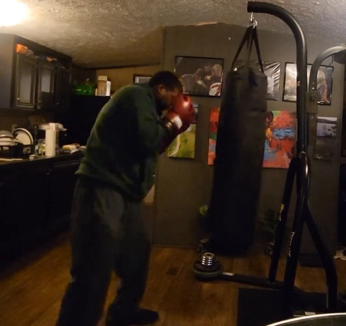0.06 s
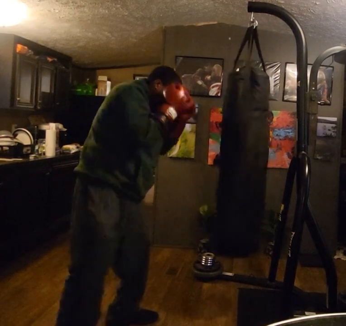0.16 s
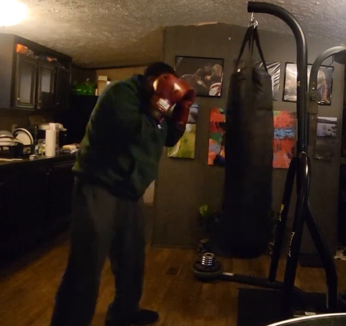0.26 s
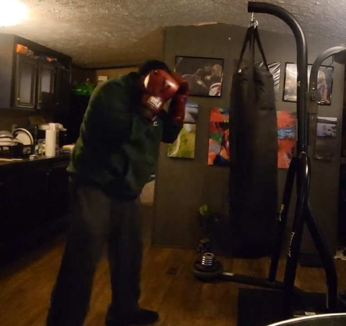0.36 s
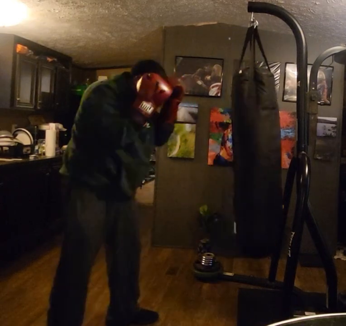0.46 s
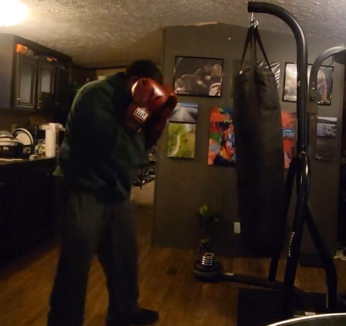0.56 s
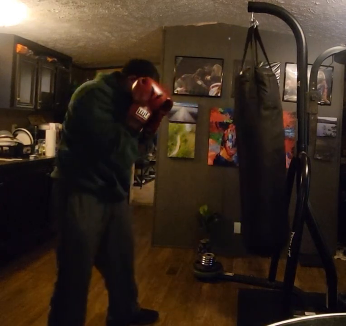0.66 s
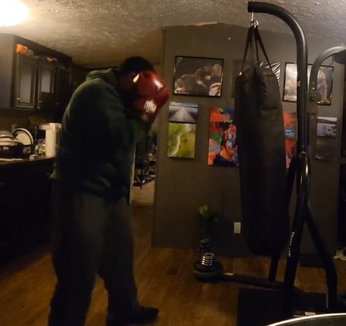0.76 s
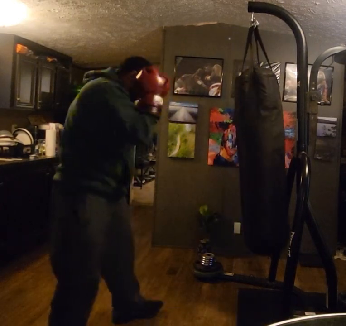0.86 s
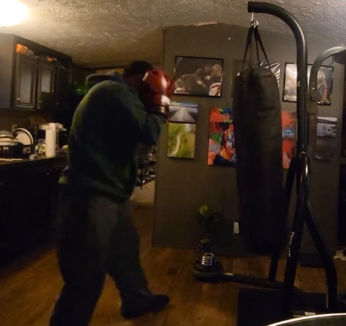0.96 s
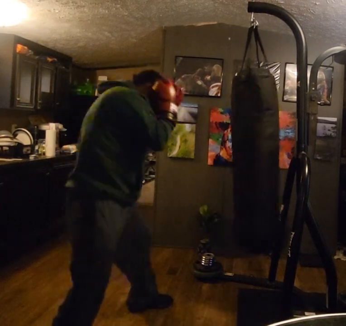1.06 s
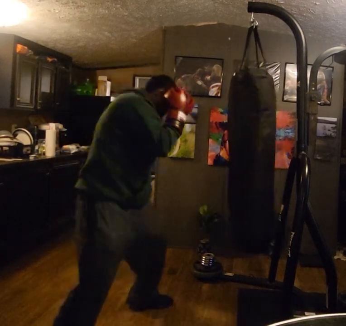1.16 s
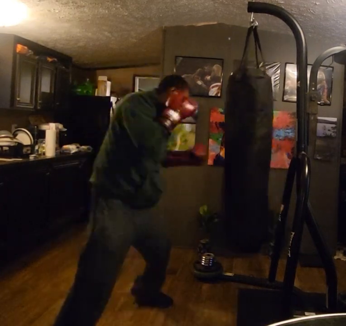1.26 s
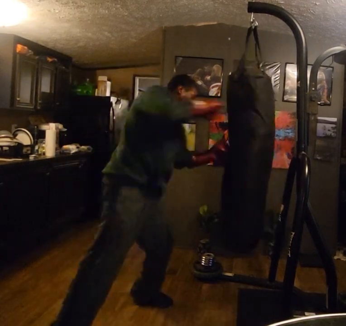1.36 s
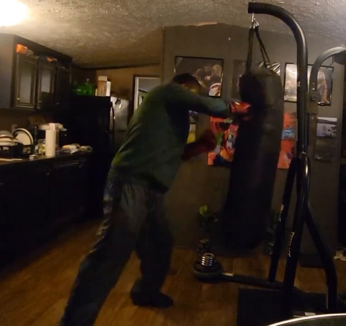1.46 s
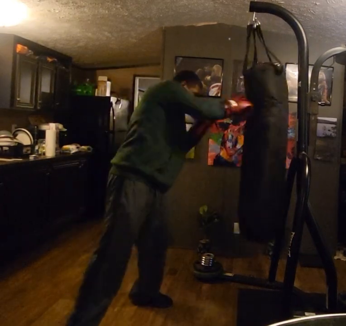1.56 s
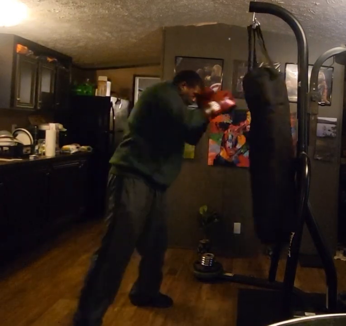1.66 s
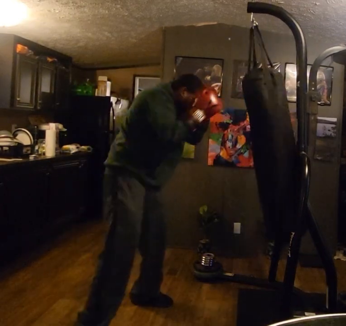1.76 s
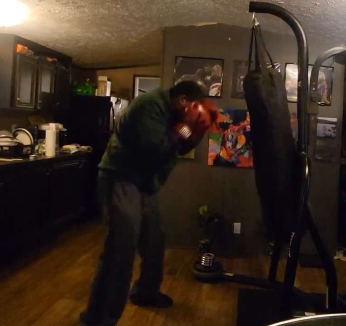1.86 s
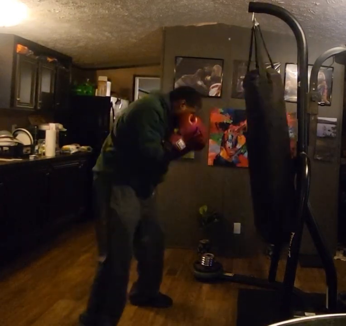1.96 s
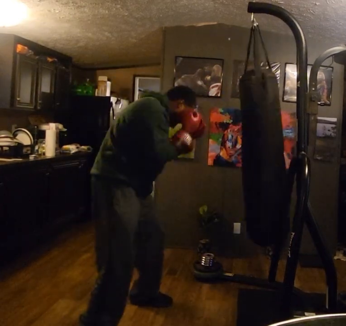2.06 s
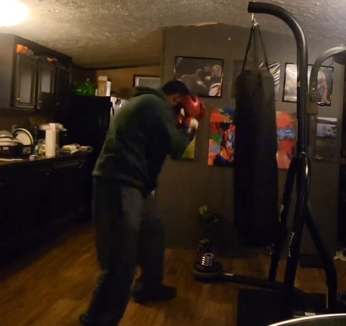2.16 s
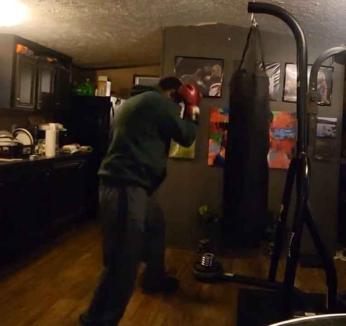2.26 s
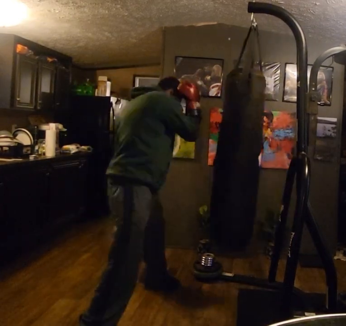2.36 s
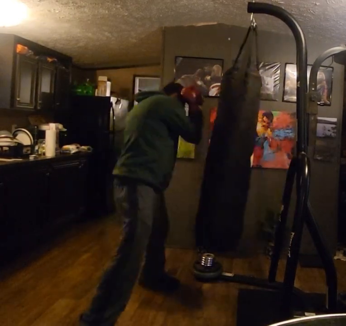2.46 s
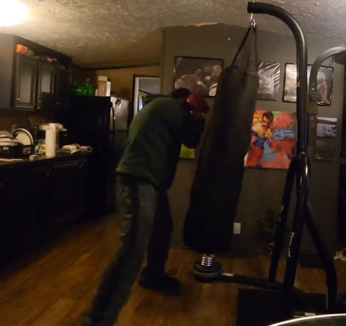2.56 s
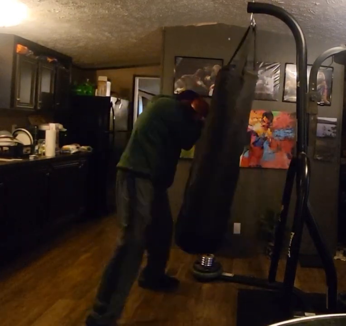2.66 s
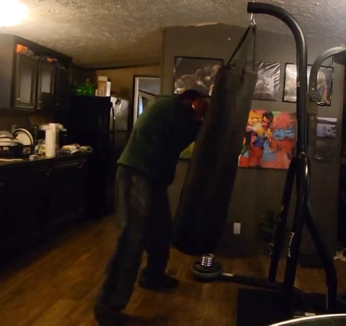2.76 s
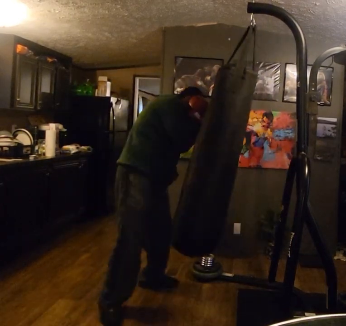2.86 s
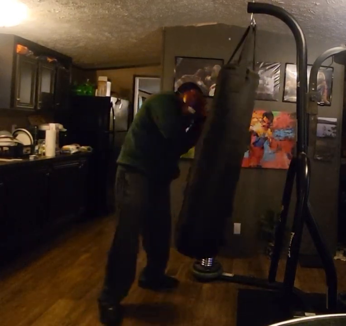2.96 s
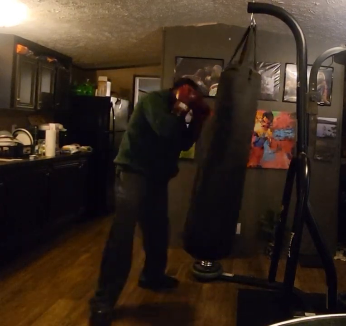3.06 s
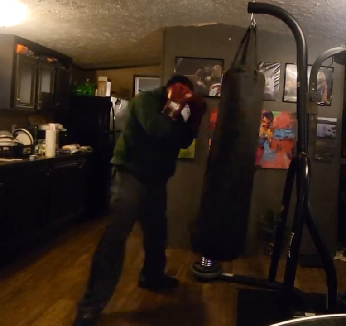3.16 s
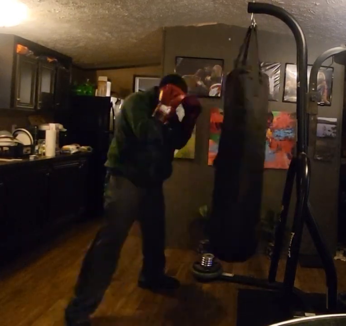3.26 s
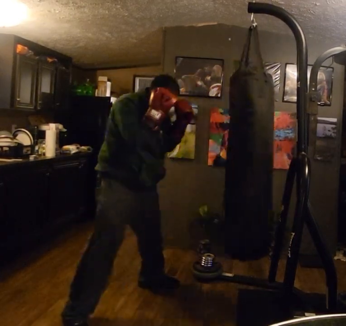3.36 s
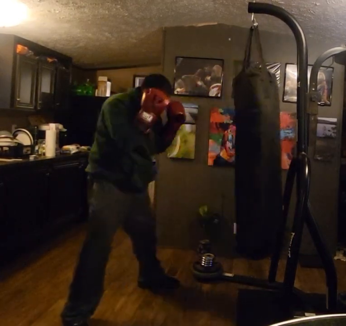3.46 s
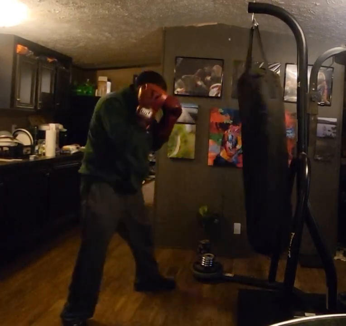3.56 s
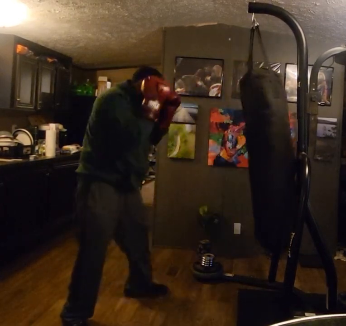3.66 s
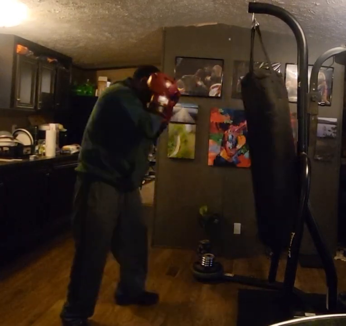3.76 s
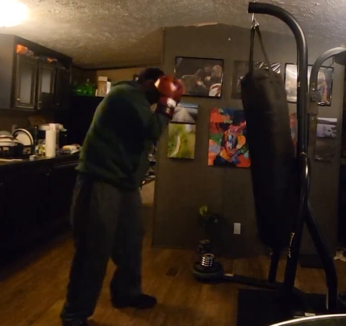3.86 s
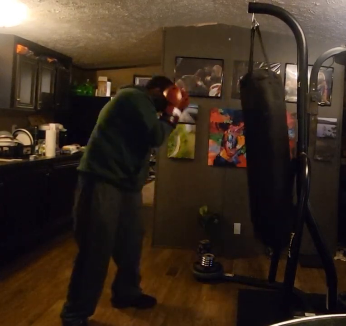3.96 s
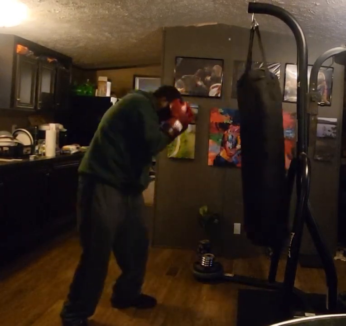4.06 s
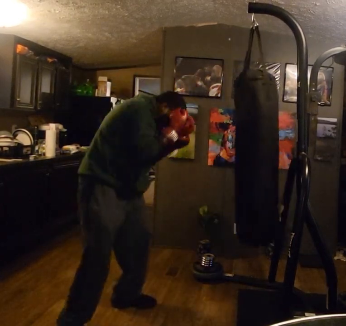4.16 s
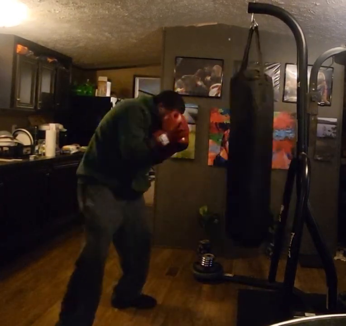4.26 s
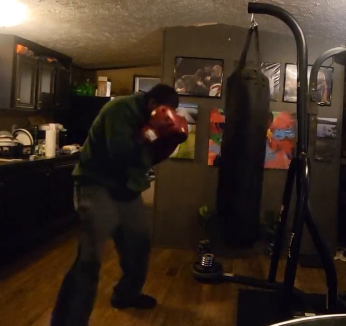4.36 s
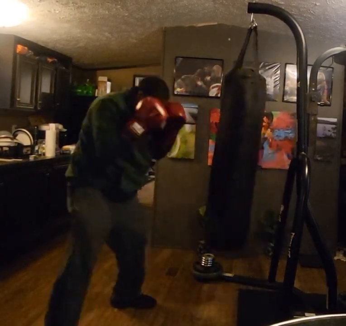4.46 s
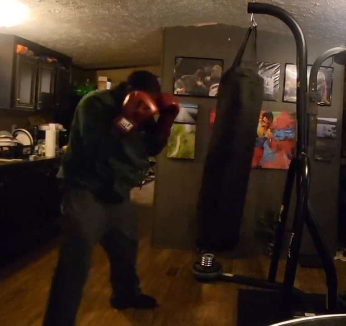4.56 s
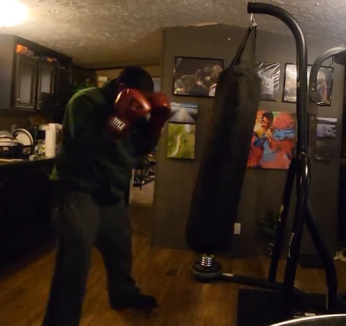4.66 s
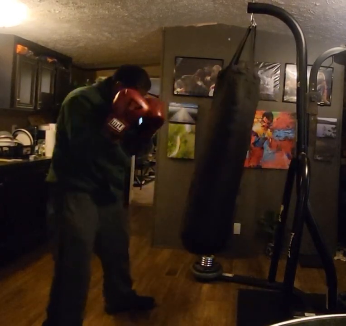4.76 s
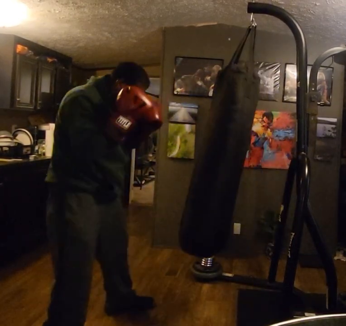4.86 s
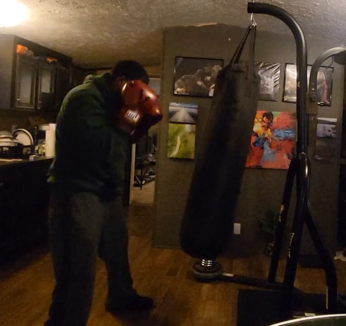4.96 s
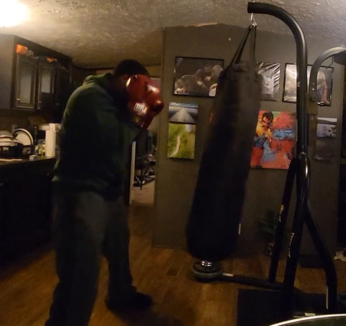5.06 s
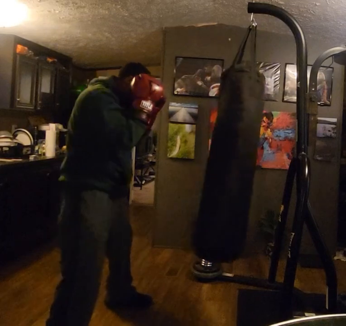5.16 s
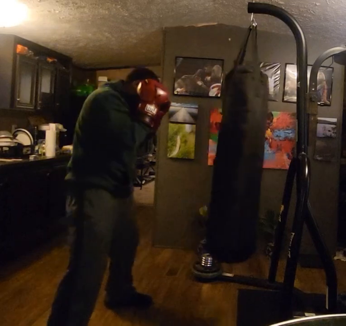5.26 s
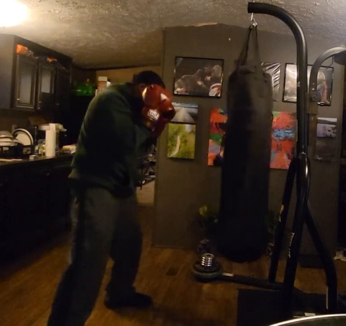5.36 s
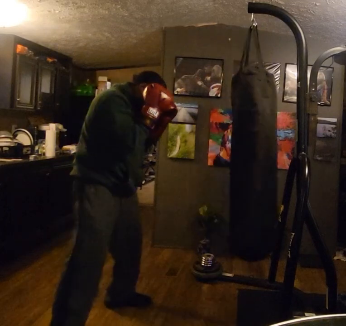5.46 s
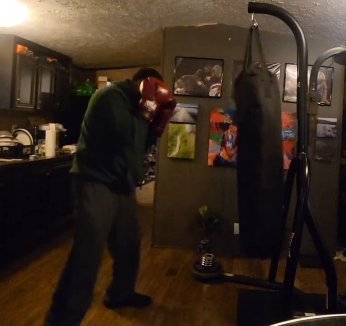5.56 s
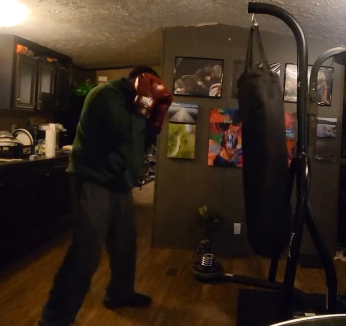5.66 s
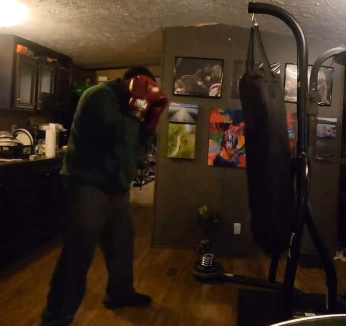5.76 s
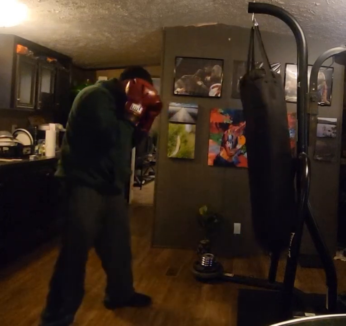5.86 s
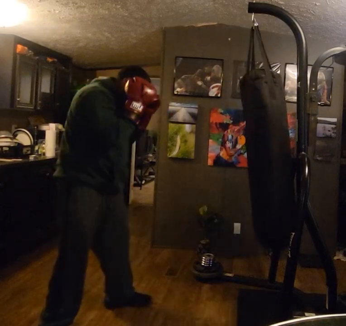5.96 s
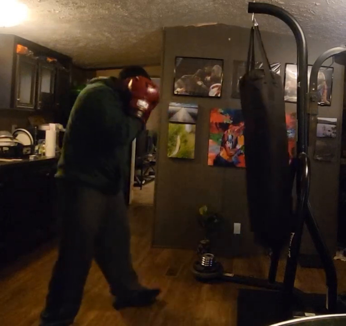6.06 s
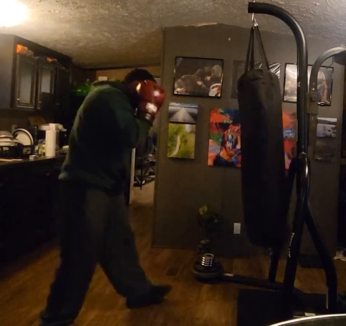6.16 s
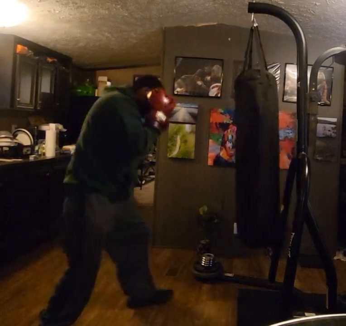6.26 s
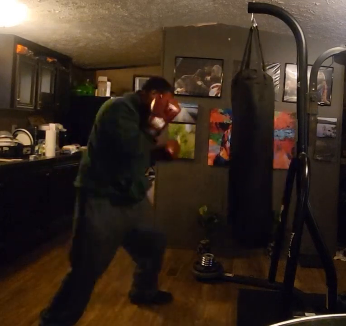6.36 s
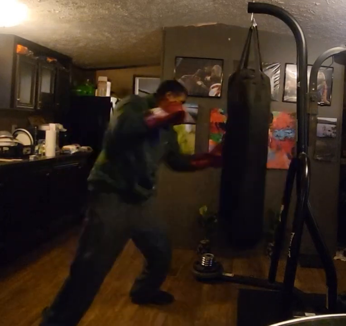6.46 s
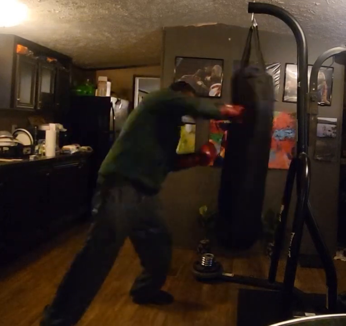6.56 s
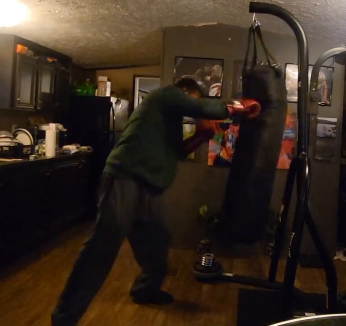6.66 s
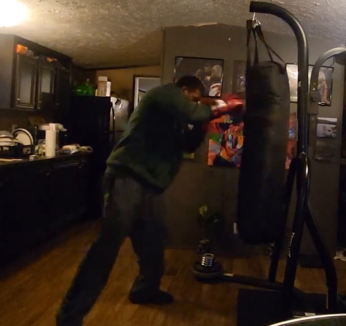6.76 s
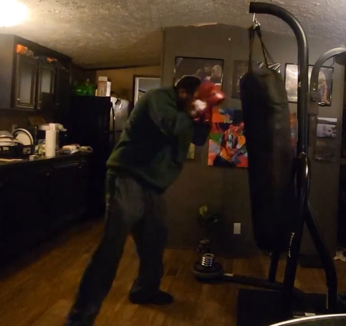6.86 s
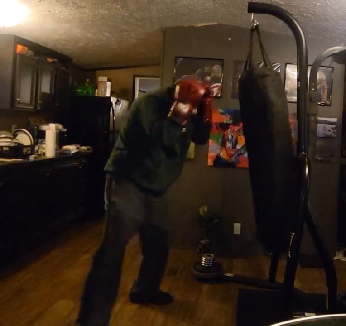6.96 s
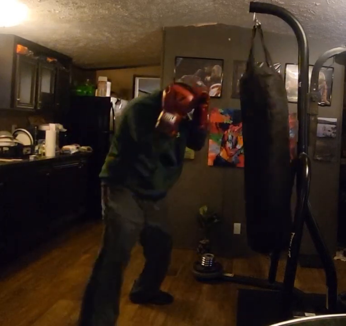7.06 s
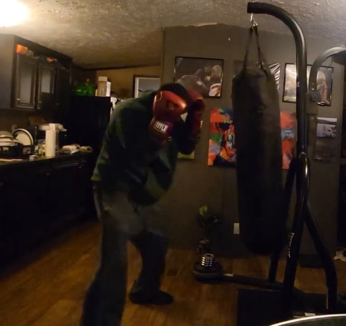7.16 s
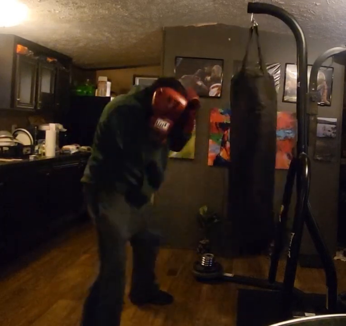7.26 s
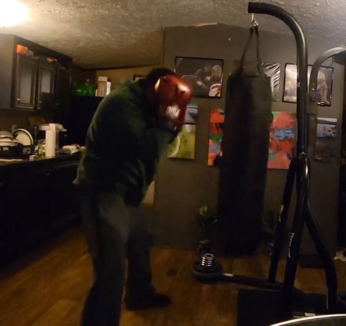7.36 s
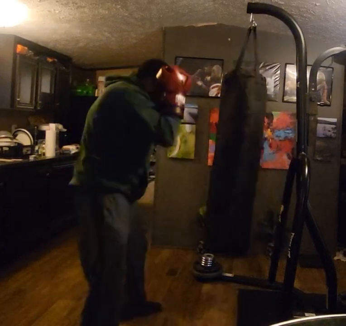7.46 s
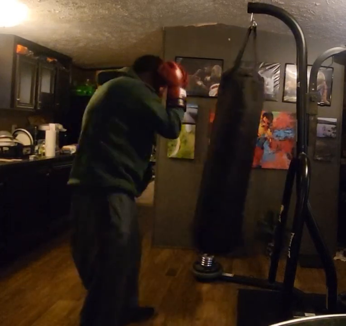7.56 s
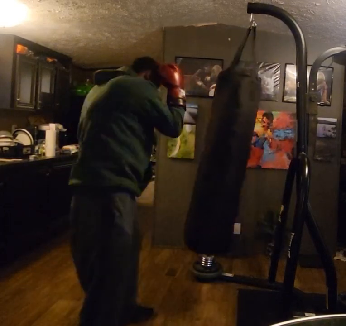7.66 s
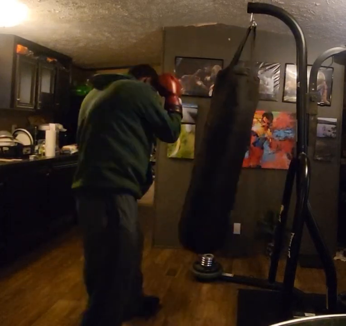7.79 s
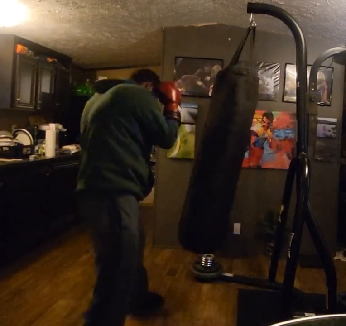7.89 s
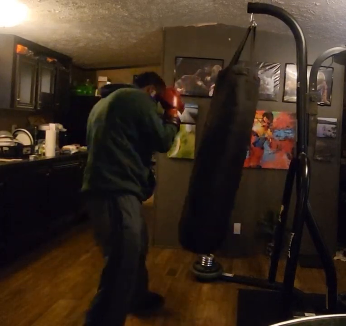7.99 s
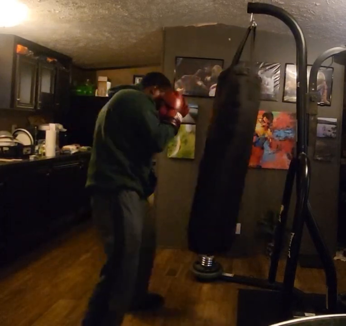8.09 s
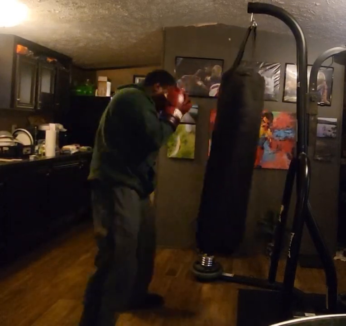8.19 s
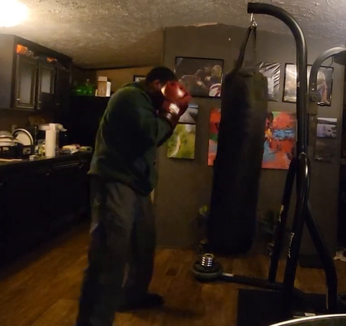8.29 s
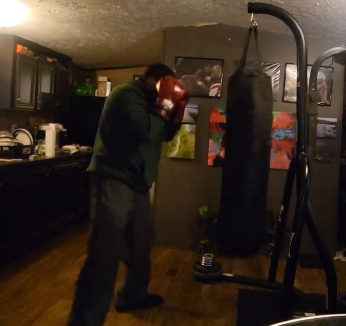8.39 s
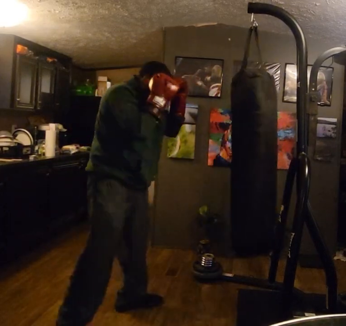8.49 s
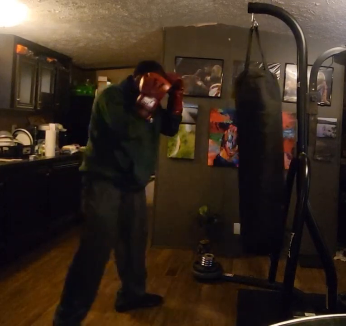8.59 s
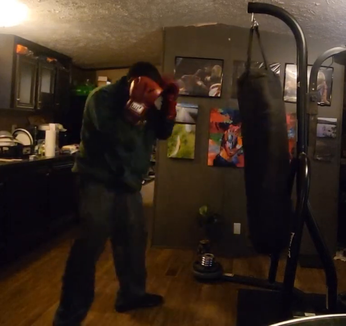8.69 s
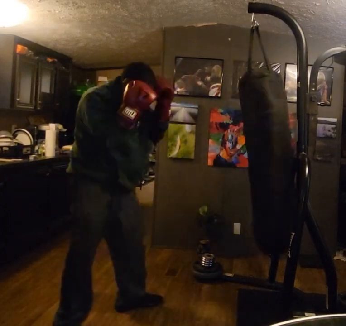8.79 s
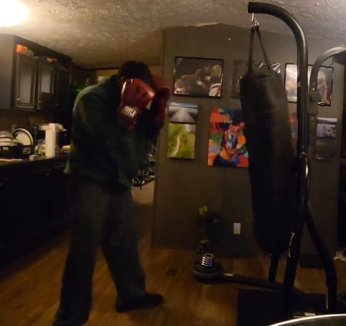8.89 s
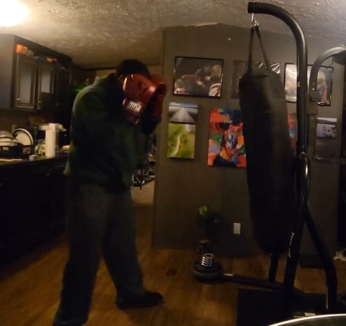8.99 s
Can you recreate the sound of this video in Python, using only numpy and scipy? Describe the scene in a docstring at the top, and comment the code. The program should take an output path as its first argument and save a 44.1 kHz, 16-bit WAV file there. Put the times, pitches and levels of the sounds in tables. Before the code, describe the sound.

Sharp glove smacks and low thuds hit a hanging bag in two short flurries, with metal rattling, separated by soft creaks and floor shifts.

```python
"""Faint rattles and creaks over a quiet house come first, then clanks and gloved punches on a heavy bag.
The bag hangs from a steel tube stand in a wood-floored room: blows and clanks excite decaying modes, links
chatter as filtered random impacts, the hook creaks by stick-slip, and shifting weight shakes the boards.
Every source but the quiet has its direct sound and a diffuse tail at a two-port microphone across the room."""
import sys
import numpy as np
from scipy import signal
from scipy.fft import rfft, irfft, next_fast_len
from scipy.io import wavfile

SR = 44100
rng = np.random.default_rng(int(sys.argv[2]) if len(sys.argv) > 2 else 0)


def dump(signal):
    """Clip the signal to [-1, 1] and save it as 16-bit WAV at the path in sys.argv[1]."""
    limited = np.clip(np.atleast_2d(signal).T, -1, 1)
    pcm = np.round(limited * 32767).astype(np.int16)
    wavfile.write(sys.argv[1], SR, pcm)


N = 398223
T = np.arange(N) / SR  # s
SIZE = next_fast_len(N + SR)  # transform length, padded for the tails
HZ = np.maximum(np.arange(SIZE // 2 + 1) * SR / SIZE, 1)

# All levels are relative; t60 is the time to fall by 60 dB.

# Spectrum of the quiet house. Each row: frequency in Hz, density in dB per Hz.
HUSH_SPECTRUM = [(15, -53), (25, -16), (70, 0), (157, -7.5), (293, -13), (641, -25), (1610, -36),
                 (7710, -42), (16000, -53.5)]
HUSH_DB = -61

# Jolts that set the stand chattering. Each row: start in seconds, rise in seconds, hold in seconds,
# fade t60 in seconds, level of the links in dB, treble share in dB, level of hollow tube and scuff in dB.
STAND_JOLTS = [(0.0, 0.00067, 0.18, 0.54, -41, -2, -53.5), (0.292, 0.018, 0.15, 0.15, -59, -2, -53.5),
               (0.704, 0.012, 0.042, 0.62, -36, 0.5, -47.5), (0.846, 0.023, 0.1, 0.72, -51, -0.5, -51.5),
               (1.073, 0.041, 0.083, 0.49, -60, 3.5, -61), (1.334, 0.029, 0.11, .2, -57.5, -6.5, -58.5),
               (1.431, 0.0093, 0.0039, 0.087, -16.5, -5.5, -24.5),
               (1.475, 0.051, 0.0073, 1.2, -19.5, 5, -26.5), (1.835, 0.019, 0.062, 0.77, -21, 6.5, -38.5),
               (1.954, 0.011, 0.087, 0.43, -21.5, -25, -30.5), (2.181, 0.0029, 0.0032, 0.32, -22.5, 6, -31),
               (2.302, 0.023, 0.031, 0.25, -36.5, -0.5, -46), (2.452, 0.012, 0.039, 0.31, -29, 8.5, -48.5),
               (2.652, 0.0028, 0.047, 3.9, -50.5, 1.5, -52.5), (2.834, 0.057, .005, 0.28, -38, 7, -44),
               (2.998, 0.0024, 0.025, 0.25, -29, 4, -38.5), (3.483, 0.0079, 0.014, 0.36, -66, -16, -53.5),
               (3.678, 0.21, 0.11, 1.1, -45, -1.5, -48.5), (4.094, 0.037, 0.065, 0.29, -44, 2, -46),
               (4.368, 0.0053, 0.012, 0.36, -38.5, 3, -37), (4.52, 0.16, 0.32, 0.23, -42, -6, -40),
               (5.055, 0.058, 0.0059, 0.28, -39, -15, -49), (5.26, 0.0016, 0.075, 0.35, -35, -15.5, -42.5),
               (5.479, 0.077, 0.031, 0.75, -52.5, 0.5, -49.5),
               (5.642, 0.0034, 0.025, 0.44, -40.5, -7.5, -30.5),
               (5.775, 0.011, 0.1, 0.29, -49.5, -2.5, -52), (5.842, 0.0088, 0.046, 0.11, -44, -4.5, -43.5),
               (5.955, 0.037, 0.19, 1.6, -41, -6.5, -44.5), (6.497, 0.0018, 0.088, .1, -46.5, -3, -49),
               (6.591, 0.0049, 0.0029, 0.093, -15, -3.5, -19), (6.662, 0.013, 0.007, 1.51, -22.5, 7, -28),
               (6.741, 0.017, 0.081, 0.77, -24, -24.5, -29.5), (7.01, 0.01, 0.047, 0.35, -20.5, 5, -32),
               (7.085, 0.0098, 0.05, 0.22, -19.5, 6, -29.5), (7.151, 0.0087, 0.031, 0.25, -16.5, 1.5, -24),
               (7.219, 0.012, 0.1, 0.28, -21, 1.5, -33), (7.412, 0.0027, 0.0056, 0.26, -30, 4, -53),
               (7.495, 0.0044, 0.081, 0.19, -41.5, 17, -49), (7.569, 0.006, 0.004, 0.43, -26, -1.5, -34.5),
               (7.736, 0.012, 0.17, 0.62, -52, -33, -55.5), (8.07, 0.006, 0.0057, 0.43, -51.5, -13, -54),
               (8.288, 0.0048, 0.011, 0.46, -51.5, -5, -57), (8.422, 0.0091, 0.2, 0.46, -65.5, 10, -55.5),
               (8.466, 0.082, 0.0043, 0.24, -49, -16, -60), (8.686, 0.016, 0.012, 0.31, -54.5, -23, -55.5),
               (8.845, 0.033, 0.066, 0.53, -62, 3.5, -56.5)]
# Spectrum of the chattering steel. Each row: frequency in Hz, density in dB per Hz.
CLATTER_SPECTRUM = [(410, -27), (700, -12.5), (1300, 4.5), (1420, 2.5), (1600, 7.5), (2730, 11.5),
                    (5610, 1.5), (7490, -2), (11100, -11), (15200, -6.5), (16000, 0.5)]
# Modes of the solid steel. Each row: frequency in Hz, strength in dB before compression,
# t60 in seconds before damping.
STEEL_MODES = [(1000, 2.5, 0.12), (1024, 10.5, 2.8), (1443, -3, 0.41), (1826, -7, 1.4), (2198, -9, 0.68),
               (2700, 0, 0.1), (2926, -23, 0.35), (3332, -35, 0.77), (3840, -5.5, 0.32), (4170, -4, 0.29),
               (4260, -29, 15), (4890, 1.5, 2.1), (5490, -16, 0.45), (6530, -14, 0.24), (6970, 7.5, 0.99),
               (7170, -6, 0.27), (7920, -3, 0.43), (7500, 8.5, 0.51)]
CLINKS_PER_S, CLINK_T60_S = 420, .04
CLINK_SPREAD, CLINK_SIZE_DB = .09, 3  # relative pitch spread; scale of the exponential spread of levels

# Weight shifting on the floor. Each row: start in seconds, rise in seconds, hold in seconds,
# fade t60 in seconds, level of the boards in dB, level of the joists in dB.
WEIGHT_SHIFTS = [(0.0, 0.0077, 0.25, 0.35, -59, -58), (0.322, 0.028, 0.074, 0.18, -56, -53),
                 (.46, 0.055, .005, .45, -77, -72), (0.716, 0.031, 0.34, .45, -59, -55.5),
                 (1.158, 0.031, .005, 0.49, -68, -44), (1.35, .04, .05, .2, -54.5, -62),
                 (1.424, 0.0095, 0.009, 0.27, -19, -26.5), (1.482, 0.016, .005, 0.72, -37, -24),
                 (1.783, 0.033, 0.091, 0.22, -46, -34), (1.95, 0.056, 0.0058, 0.29, -37, -32.5),
                 (2.022, 0.015, 0.012, .33, -28, -28), (2.2, 0.0099, 0.0048, 0.68, -38, -40.5),
                 (2.229, 0.067, 0.0041, 2.5, -59, -41), (2.703, 0.086, 0.24, 0.94, -58.5, -68),
                 (3.277, 0.22, 0.012, 0.77, -53, -49), (3.715, 0.069, 0.48, .45, -59, -56),
                 (4.362, .01, 0.064, 0.47, -54, -38.5), (4.52, 0.1, 0.35, 0.34, -47, -47.5),
                 (5.104, 0.039, .005, .45, -47, -52), (5.237, 0.13, .005, .4, -57, -43.5),
                 (5.397, 0.054, .15, .3, -52.5, -67), (5.577, 0.022, 0.0041, 0.13, -45, -49),
                 (5.654, 0.017, 0.17, .6, -46.5, -49.5), (6.008, 0.044, 0.22, 0.5, -53.5, -56),
                 (6.348, 0.062, 0.19, .2, -52.5, -43.5), (6.587, 0.0034, 0.011, 0.27, -24.5, -27),
                 (6.693, 0.0073, 0.018, 0.23, -25, -28), (6.765, 0.022, 0.2, .45, -34.5, -36),
                 (7, .02, 0.21, 0.63, -32.5, -28.5), (7.483, 0.009, .005, 0.73, -37.5, -39),
                 (7.771, 0.041, 0.21, 0.31, -54, -65), (7.975, 0.063, 0.0039, 0.37, -55.5, -50.5),
                 (8.384, 0.021, 0.065, 1.8, -54, -55), (8.716, 0.057, 0.0042, .6, -55, -57),
                 (8.87, 0.044, 0.075, .3, -61, -69)]
# Floor modes, the first two joists and the others boards. Each row: frequency in Hz, width in Hz, level in dB.
FLOOR_MODES = [(45.6, 30, 3), (74, 8.3, 7), (152, 22, -1), (217, 25, -9.5)]
# Modes of the hollow stand tubes. Each row: frequency in Hz, width in Hz, level in dB.
TUBE_MODES = [(403, 7.1, -4), (458, 100, -6.5), (586, 100, -1), (646, 31, 0), (873, 230, -4),
              (1073, 51, -2)]
ROCKING_DB = -1.34  # level of the board, joist and tube knocks

# Hook grinding under load. Each row: start in seconds, rise in seconds, hold in seconds, fade t60 in seconds,
# level in dB, first pitch in Hz, last pitch in Hz, share of the ringing hook in dB.
HOOK_CREAKS = [(0.056, 0.013, 0.16, 0.16, -57, 964, 1009, 6),
               (0.716, 0.0045, 0.03, 0.27, -37.5, 1007, 1000, -10),
               (3.753, 0.089, 0.084, 0.31, -56.5, 867, 944, 6),
               (3.953, 0.0062, 0.046, 0.53, -41.5, 990, 988, -4.5),
               (4.115, 0.006, 0.058, 0.42, -39.5, 1035, 1078, -12),
               (4.369, 0.019, 0.025, 0.097, -45.5, 1046, 1068, -5),
               (5.347, 0.0066, 0.034, 0.47, -48, 1057, 1041, -15),
               (5.969, 0.014, 0.34, 0.34, -45, 907, 868, -3)]
# Modes of the hook. Each row: frequency in Hz, width in Hz, level in dB.
HOOK_MODES = [(1640, 110, 5), (2190, 55, 8), (2760, 90, -3), (3330, 80, 4), (3860, 90, -5), (4290, 70, 1),
              (5940, 80, -4), (6700, 100, 4), (7470, 110, -2), (8100, 130, 3)]
# Short squeaks and brief rings of tube and steel, faint to loud. Each row: start in seconds, level in dB,
# pitch in Hz, exponential fade constant in seconds, step per overtone in dB.
SQUEAKS_AND_RINGS = [(.005, -51, 3750, .03, -20), (.05, -49, 2850, .06, -20), (.185, -41, 1990, .04, -12),
                     (5.65, -50, 2100, .06, -20), (1.69, -31, 2600, .03, -20), (1.835, -29, 1110, .03, -20),
                     (1.86, -29, 1410, .035, -20), (2.04, -31, 2050, .03, -20),
                     (2.33, -39, 1670, .04, -4.5), (2.47, -41, 5100, .045, -20), (2.86, -48, 3310, .03, -3),
                     (3.93, -50, 1520, .03, -20), (3.93, -51, 4280, .04, -20),
                     (6.878, -28, 1830, .012, -20), (7.02, -28, 4390, .02, -20),
                     (4.811, -42, 10840, .025, -20), (.95, -56, 640, .08, -20), (.85, -57, 2800, .06, -20),
                     (3.15, -67, 3150, .25, -20), (4.383, -38, 630, .02, -20), (8.3, -57, 500, .015, -20),
                     (8.455, -51, 660, .02, -20), (8.55, -53, 650, .035, -20), (8.655, -58, 670, .07, -20),
                     (8.715, -50, 630, .025, -20), (8.93, -51, 650, .02, -20), (.3, -68, 2000, .15, -20),
                     (7.425, -37, 640, .02, -20), (7.505, -34, 620, .02, -20)]
WAVER, OCTAVE_DB, SCRAPE_HZ = 0.016, -8, 40  # creak pitch spread; step per overtone; width of its rasp

# Single steel clanks. Each row: start in seconds, level in dB, treble share in dB, tube share in dB.
STEEL_CLANKS = [(0.1323, -51, -20, -16), (0.721, -28, 8, -40), (1.161, -50, 12, 1), (1.499, -16, -21, -1.5),
                (1.654, -12, -35, -16.5), (1.827, -15, 8.5, -5.5), (1.856, -11, -17.5, -13),
                (1.938, -13.5, -27, -11.5), (2.097, -25, 6, -23), (2.1882, -19.5, -43, -32),
                (2.462, -36, -29.5, -4), (2.659, -31.5, -18, -7.5), (2.6995, -31.5, 20, -12),
                (2.8574, -32, -21, -4.5), (3.005, -19, 14, -16), (3.7742, -53, 1, 3), (3.8253, -40, 9, -4),
                (3.9351, -31, 8, -3), (4.1094, -36, -16, -17), (4.375, -29, -22, -2),
                (5.1173, -44.5, -8, -5), (5.2627, -40, 5, 3), (5.65, -42, 9, 14), (5.76, -36.5, 8.5, -11),
                (5.9753, -43.5, -31, -15), (6.4992, -47, -18, -1.5), (6.693, -10, -17, -3),
                (6.8008, -12.5, -23.5, -1.5), (6.8831, -15.5, 10, -22), (7.0183, -14, -14.5, -3),
                (7.039, -16.5, -10, -28.5), (7.091, -15, -12.5, -19.5), (7.415, -21.5, -28, -5),
                (7.4986, -22, -33, -12.5), (7.5463, -11.5, 14.5, -26), (7.9157, -47, 3, -9),
                (8.068, -51, -30, -8), (8.128, -43.5, 8, -26), (8.3015, -61, 6, -18),
                (8.5285, -48.5, 8, 8.5)]

# Punches and heavy footfalls. Each row: start in seconds, thud level in dB, boom t60 in seconds,
# bag share in dB, boom pitch in Hz, bag pitch in Hz.
HEAVY_BLOWS = [(1.2, -44.5, 0.13, -18.5, 73.6, 490), (1.433, -15, 0.15, -8.5, 165, 410),
               (1.528, -21, 0.11, 7, 107, 445), (1.555, -31, 0.25, 11.5, 149, 656),
               (1.972, -20, 0.19, 3, 233.6, 586), (2.025, -24, 0.082, -16, 65, 630),
               (2.069, -22, 0.098, -12, 75.1, 495), (3.492, -45, 0.62, -20, 150.7, 632),
               (4.388, -31.5, 0.4, -12, 90, 480), (5.588, -42.5, 0.27, -18, 156, 490),
               (6.394, -38.5, 0.21, -33, 54, 494), (6.595, -15.5, 0.15, -6.5, 161, 412),
               (6.675, -6, 0.073, -1.5, 116, 440), (6.7, -15, 0.13, 0, 94, 503),
               (6.798, -18, 0.071, 7, 105, 590), (6.87, -17.5, 0.26, -7, 50.3, 480),
               (7.159, -20.5, 0.067, 8.5, 229, 570), (7.249, -22, 0.25, -18, 44, 480),
               (8.406, -46.5, 0.095, -23, 197, 495), (8.72, -49, 0.27, -4, 199, 615),
               (8.9, -63, 0.18, 8, 159, 900)]
# Modes of the bag. Each row: frequency in Hz, width in Hz, level in dB.
BAG_MODES = [(415, 150, -6.5), (504, 65, -2), (688, 50, -10)]
# Gloves cracking on the bag's cover. Each row: start in seconds, peak level in dB.
GLOVE_CRACKS = [(1.4338, -.5), (1.5292, -2.5), (6.5952, 0), (6.6765, -3.5)]
SAG, SAG_S = .25, 0.0075  # a boom sets in this fraction higher and sinks to its pitch

# Decay of the diffuse tail. Each row: frequency in Hz, t60 in seconds.
ROOM_DECAY = [(100, 0.6), (300, 0.37), (700, 0.29), (1800, 0.19), (5000, 0.19), (13000, 0.1)]
# Colour of the two ports. Each row: frequency in Hz, left minus right in dB.
PORT_COLOUR = [(60, 0), (110, 1), (200, 0.5), (380, -2), (700, 1), (1290, -0.5), (2380, -2.5), (4400, -0.5),
               (8120, -13), (15000, -3.5)]
RISE_DB = 15  # how far below its peak a burst sets in
LEFT_LAG = 4  # samples by which direct sound is later on the left
TOP_HZ = 15900


def undb(db):
    """Level law: decibels to amplitude gain."""
    return 10 ** (np.asarray(db) / 20)


def unit(x):
    """Normalisation to an rms of 1."""
    return x / np.sqrt(np.mean(x ** 2))


def over_hz(table):
    """Interpolation of a (Hz, value) table over log frequency, at every bin."""
    hz, value = np.transpose(table)
    return np.interp(np.log(HZ), np.log(hz), value)


def shaped(x, gain):
    """Linear filtering: multiply the spectrum by a gain per bin."""
    return irfft(rfft(x, SIZE) * gain, SIZE)[..., :N]


def band(x, lo_hz, hi_hz):
    """Band-pass filtering by a causal Butterworth section."""
    return signal.sosfilt(signal.butter(2, [lo_hz, hi_hz], "band", fs=SR, output="sos"), x)


def resonances(peaks):
    """Superposition of damped resonators: causal response of parallel (Hz, width, dB) modes."""
    return sum(undb(db) * 1j * HZ * w / (hz ** 2 - HZ ** 2 + 1j * HZ * w) for hz, w, db in peaks)


def clicks(rate, spread_db):
    """Random impacts at a mean rate per second, many small and a few large."""
    hit = rng.random(N) < rate / SR
    size = undb(spread_db * np.minimum(rng.exponential(size=N), 4))
    return unit(hit * rng.standard_normal(N) * size)


def add(out, s, sound):
    """Superposition: mix a short sound in at a time."""
    i = int(s * SR)
    out[i:i + len(sound)] += sound[:N - i]


def knock(modes, t, t60, near_hz=None, sag=0):
    """Modal excitation: one blow weights the modes anew, those far from the struck spot's pitch staying weaker."""
    hz, _, db = np.transpose(modes)
    if near_hz:
        far_db = 14 * abs(np.log2(hz / near_hz))
        hz, db = np.append(hz, near_hz), np.append(db - far_db, max(db))
    gain = undb(db + 3 * rng.standard_normal(len(hz)))
    sunk_t = t + sag * SAG_S * (1 - np.exp(-t / SAG_S))  # warped time lets the pitch sink
    ring = gain @ np.sin(2 * np.pi * hz[:, None] * sunk_t)
    return ring / np.sqrt(np.sum(gain ** 2)) * undb(-60 * t / t60)


def burst(s, rise_s, hold_s, t60):
    """Envelope of one burst: samples and gain as it climbs to its peak, holds, then decays exponentially."""
    rise_s = max(rise_s, .001)
    i = int(s * SR)
    t = T[:min(3 * SR // 2, N - i)]
    up = np.minimum(t / rise_s - 1, 0)
    down = np.maximum(t - rise_s - hold_s, 0) / t60
    return slice(i, i + len(t)), undb(RISE_DB * up - 60 * down)


def overlap(shapes, db):
    """Addition of powers: gain curves of overlapping bursts, one per column of levels."""
    power = np.full((db.shape[1], N), 1e-12)
    for row, gain in zip(shapes, undb(db)):
        span, shape = burst(*row)
        power[:, span] += np.outer(gain, shape) ** 2
    return np.sqrt(power)


def hush():
    """Coloured noise: the quiet of the house, mostly alike at the two ports."""
    mid, side = shaped(rng.standard_normal((2, N)), undb(over_hz(HUSH_SPECTRUM)))
    return undb(HUSH_DB) * unit(mid + 0.22 * side * np.array([[1], [-1]]))


def jolts():
    """Excitation envelopes: gains of the links, their treble and the tubes."""
    rows = np.array(STAND_JOLTS)
    links_db, share_db, tube_db = rows[:, 4:].T
    return overlap(rows[:, :4], np.transpose([links_db, links_db + share_db, tube_db]))


def clinks():
    """Random modal excitation: each touch of the links rings briefly near one mode of the steel."""
    out, t = np.zeros(N), T[:int(CLINK_T60_S * SR)]
    count = int(CLINKS_PER_S * N / SR)
    when, which, size = rng.random((count, 3)).T
    mode_hz = np.array(STEEL_MODES)[(which * len(STEEL_MODES)).astype(int), 0]
    hz = mode_hz * (1 + CLINK_SPREAD * rng.standard_normal(count))
    gain = undb(-CLINK_SIZE_DB * np.log(np.maximum(size, .02)))
    rings = gain[:, None] * np.sin(2 * np.pi * hz[:, None] * t) * undb(-60 * t / CLINK_T60_S)
    for s, ring in zip(when * N / SR, rings):
        add(out, s, ring)
    return out


def rattle(links, bright):
    """Impact noise of dense link and joint contacts: harder contact shifts the weight to the treble."""
    spurts = undb(2.0 * unit(band(rng.standard_normal(N), 23, 45)))  # contact comes unevenly
    struck = clicks(2500, 4.34) * spurts + undb(-6) * unit(clinks())
    steel = rfft(struck, SIZE) * undb(over_hz(CLATTER_SPECTRUM))
    upper = 1 / (1 + (5800 / HZ) ** 6)
    top = 1 / (1 + (9800 / HZ) ** 8)
    low, high, air = irfft(steel * np.array([1 - upper, upper - top, top]), SIZE)[:, :N]
    hardness = (links * undb(22)) ** .2
    treble = (high + hardness * air) / np.std(high + air)
    return (links * unit(low) + bright * treble) / 2  # level of the rattle at each of two spots on the stand


def rocking(tube_gain):
    """Forced resonance: small knocks shake the boards, the joists under them and the hollow tubes."""
    rows = np.array(WEIGHT_SHIFTS)
    boards_gain, joists_gain = overlap(rows[:, :4], rows[:, 4:])
    joists = band(shaped(clicks(400, 2.7), resonances(FLOOR_MODES[:2])), 28, 320)
    boards = band(shaped(clicks(400, 2.7), resonances(FLOOR_MODES[2:])), 28, 320)
    hollow = band(shaped(clicks(900, 4.5), resonances(TUBE_MODES)), 300, 1400)
    scuff = band(clicks(1500, 1.3), 310, 1050)
    tubes = unit(unit(hollow) + undb(-7) * unit(scuff))
    return joists_gain * unit(joists) + boards_gain * unit(boards) + tube_gain * tubes


def creaks():
    """Stick-slip friction in the hook's creaks, plus decaying harmonics for squeaks and rings of tube and steel."""
    wobble = unit(band(rng.standard_normal(N), 8, 60))
    hook = unit(band(shaped(clicks(1200, 3.5), resonances(HOOK_MODES)), 1200, 11000))
    slips = unit(shaped(rng.standard_normal((6, N)), 1 / (1 + (HZ / SCRAPE_HZ) ** 2)))
    rasp = 1 + .7 * (slips[:3] + 1j * slips[3:])  # uneven slips spread each partial into a band
    out = np.zeros(N)
    for s, rise_s, hold_s, t60, db, first_hz, last_hz, hook_db in HOOK_CREAKS:
        span, shape = burst(s, rise_s, hold_s, t60)
        hz = np.interp(T[span], [s, s + rise_s + hold_s + t60 / 4], [first_hz, last_hz])
        phase = 2 * np.pi * np.cumsum(hz * (1 + WAVER * wobble[span])) / SR
        tone = sum(undb(k * OCTAVE_DB) * (rasp[k, span] * np.exp(1j * (k + 1) * phase)).real
                   for k in range(3))
        tone = tone * undb(4 * np.clip(np.flip(wobble)[span], -3, 1))  # uneven loudness
        out[span] += undb(db) * shape * (tone + undb(hook_db) * hook[span])
    t = T[:SR // 2]
    for s, db, hz, fade_s, step_db in SQUEAKS_AND_RINGS:
        waver = np.roll(wobble, -int(s * SR))[:len(t)]
        turns = np.cumsum(hz + 1.6 * np.sqrt(hz) * waver) / SR
        tone = sum(undb(k * step_db) * np.sin(2 * np.pi * (k + 1) * turns)
                   for k in range(5) if (k + 1) * hz < TOP_HZ)
        onset = np.minimum(t * hz / 4, 1)  # four periods long
        add(out, s, undb(db + 7.5) * tone * onset * np.exp(-t / fade_s))
    return out


def clanks():
    """Impact on steel: a short contact noise excites inharmonic modes, weighted and tuned anew each time."""
    out, t = np.zeros(N), T[:SR // 3]
    hz, db, t60 = np.transpose(STEEL_MODES)
    for s, level_db, treble_db, tube_db in STEEL_CLANKS:
        luck = rng.standard_normal((2, len(hz)))
        mode_db = np.clip(.3 * (db + 60 * .03 / t60), -25, 0)  # compressed strengths
        gain = undb(mode_db + 4.5 * luck[0])
        pitch = hz * (1 + 0.029 * luck[1])
        decay = undb(-60 * t / (0.26 * np.minimum(t60, .4)[:, None]))  # damped modes
        ring = gain @ (np.sin(2 * np.pi * pitch[:, None] * t) * decay)
        contact = rng.standard_normal(len(t)) * np.exp(-t / .008) * np.minimum(t / .001, 1)
        body = undb(-10) * ring / np.sqrt(np.sum(gain ** 2)) + 2.35 * band(contact, 990, 6500)
        treble = undb(treble_db - 13.0) * band(contact, 4400, 21000)
        tube = knock(TUBE_MODES, t, t60=.03) + 4.0 * band(contact, 480, 1100)
        add(out, s, undb(level_db) * (body + treble + undb(tube_db - 0.5) * tube))
    return out


def blows():
    """Struck damped modes: the boards boom and the bag thumps; the glove cracks and the floor reflects it."""
    out, t = np.zeros(N), T[:SR // 2]
    for s, thud_db, t60, bag_db, hz, bag_hz in HEAVY_BLOWS:
        boom = knock(FLOOR_MODES, t, t60, near_hz=hz, sag=SAG)
        thump = knock(BAG_MODES, t, 0.72 * t60, near_hz=bag_hz)
        push = np.minimum(t / 0.0046, 1)  # a soft push rises over milliseconds
        add(out, s, undb(thud_db + 3.0) * (boom + undb(bag_db - 1.5) * thump) * push)
    for s, db in GLOVE_CRACKS:
        hiss = .1 * rng.standard_normal(len(t)) * np.exp(-t / .002)
        crack = -np.exp(-t / .00014) + hiss
        add(out, s, undb(db) * crack)
        add(out, s + .003, undb(db - 3) * crack)  # floor reflection
    return out


def room(x, wet_db, onset_s=0.00094, alike_hz=450):
    """Direct sound and diffuse reverberation: the tail decays by band, its bass more alike at both ports."""
    t = T[:SR * 3 // 4]
    hz, t60 = np.transpose(ROOM_DECAY)
    bins = np.maximum(np.arange(len(t) // 2 + 1) * SR / len(t), 1)
    place = np.interp(np.log(bins), np.log(hz), np.arange(len(hz)))
    tail = 0
    for k, t60_s in enumerate(t60):
        share = np.sqrt(np.clip(1 - abs(place - k), 0, 1))  # neighbouring bands cross-fade in power
        noise = irfft(rfft(rng.standard_normal((2, len(t)))) * share, len(t))
        decay = undb(-60 * t / t60_s) * (1 - np.exp(-t / onset_s))
        tail = tail + noise * decay / np.sqrt(t60_s * SR / np.log(1e6))
    mid, side = rfft(tail, SIZE)
    apart = np.maximum(HZ ** 2 / (HZ ** 2 + alike_hz ** 2), .36)
    tail = (mid + np.array([[1], [-1]]) * apart * side) / np.sqrt(1 + apart ** 2)
    direct = np.exp(-2j * np.pi * HZ * np.array([[LEFT_LAG], [0]]) / SR)
    return shaped(x, (direct + undb(wet_db) * tail) / np.hypot(1, undb(wet_db)))


def scene():
    """Superposition of sources: bag, hook end and base of the stand each have their own room response."""
    bag = room(blows(), wet_db=-7)
    links, bright, tubes = jolts()
    top = room(rattle(links, bright), wet_db=8.5) + room(creaks(), wet_db=2.5)
    base = room(rattle(links, bright) + undb(ROCKING_DB) * rocking(tubes), wet_db=5.5)
    return bag + room(clanks(), wet_db=10.0) + top + base + hush()


def record(dry):
    """Transducer response: the ports differ in colour, loud peaks saturate and both band ends are cut."""
    ports = shaped(dry, undb(over_hz(PORT_COLOUR) * np.array([[.5], [-.5]])))
    bass_cut = signal.butter(3, 38, "high", fs=SR, output="sos")  # small capsules lose the deepest bass
    rounded = np.tanh(signal.sosfilt(bass_cut, ports))
    return signal.sosfilt(signal.ellip(12, .2, 80, TOP_HZ, fs=SR, output="sos"), rounded)


dry = scene()
out = record(dry)
dump(out)
```